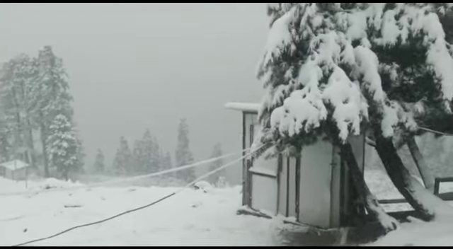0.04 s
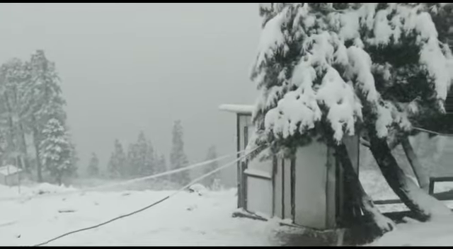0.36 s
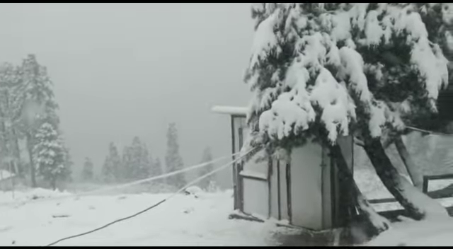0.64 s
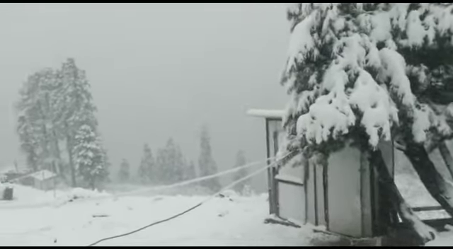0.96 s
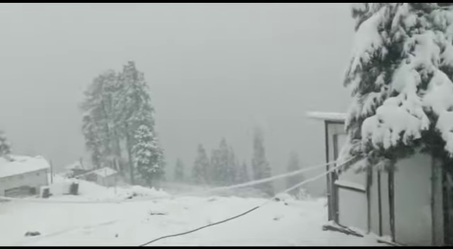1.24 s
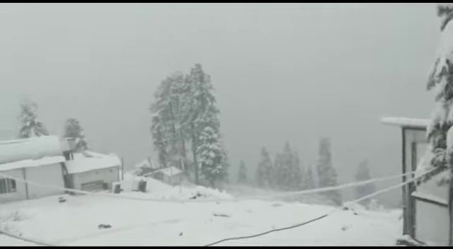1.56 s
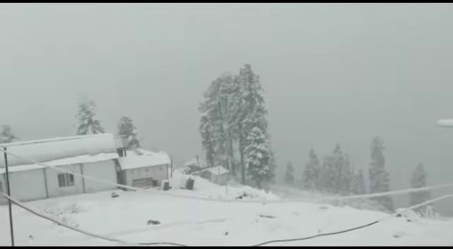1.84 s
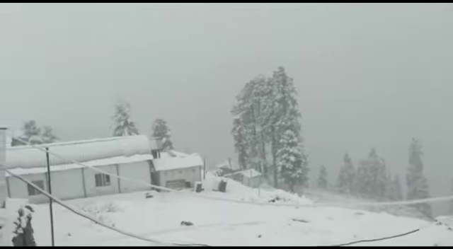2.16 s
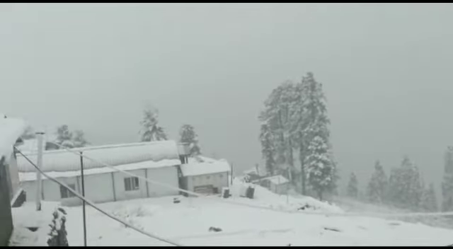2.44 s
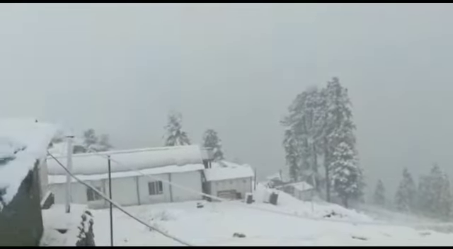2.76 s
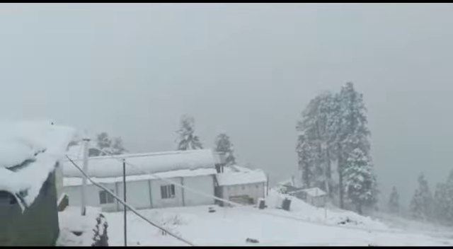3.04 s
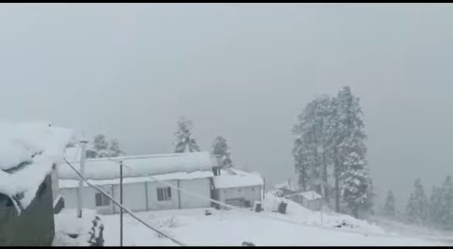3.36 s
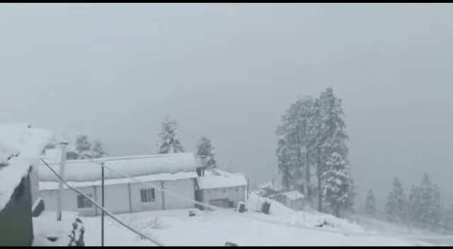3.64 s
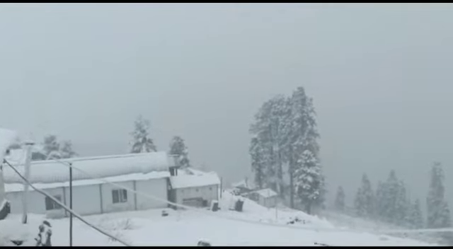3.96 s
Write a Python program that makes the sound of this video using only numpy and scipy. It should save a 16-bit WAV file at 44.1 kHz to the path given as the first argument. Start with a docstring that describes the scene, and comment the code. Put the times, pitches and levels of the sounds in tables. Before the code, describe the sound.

Soft, low wind buffeting outdoors, with faint ticking snow grains and rustling cloth.

```python
"""Light wind buffets the microphone ports of a hand-held camera turning slowly in a snowy yard.
Eddies rumble and thump, mostly on the right port, over a soft hush of air.
Snow grains tick on and near the camera. A jacket rustles with the turn, catches and scuffs once,
and packed snow crunches faintly as it gives way underfoot."""
import sys
import numpy as np
from scipy.fft import rfft, irfft, next_fast_len
from scipy.io import wavfile
from scipy.ndimage import uniform_filter1d, map_coordinates

SR = 44100
rng = np.random.default_rng(int(sys.argv[2]) if len(sys.argv) > 2 else 0)


def wrap_up_sound(samples):
    """Save the sound to the file named by the first command line argument, as 16-bit audio."""
    columns = np.atleast_2d(samples).T
    # keep every value between -1 and 1, then stretch to whole-number steps
    tamed = np.clip(columns, -1, 1)
    steps = np.round(tamed * 32767).astype(np.int16)
    wavfile.write(sys.argv[1], SR, steps)


N = 176400

# EQ for the body of a snow grain's tick and for its bright top: f/Hz, gain/dB
GRAIN_BODY_EQ = [(400, -43), (1400, -6.5), (2400, 0), (3700, 3), (4900, -3), (5700, 5), (7500, -73),
                 (15000, -56)]
GRAIN_TOP_EQ = [(2000, -51), (6000, 3), (8500, 1), (10000, -0.5), (12500, 4.5), (15500, 0.5)]


def amp(db):
    return 10 ** (np.asarray(db) / 20)


def unit(x):
    """Scaled to rms 1."""
    return x / np.sqrt(np.mean(x ** 2) + 1e-20)


def curves(rows):
    """One value per sample for each column after the time."""
    times, *columns = np.transpose(rows)
    return [np.interp(np.arange(N) / SR, times, column) for column in columns]


def wobble(rate):
    """A smooth random curve, rate knots a second."""
    knots = rng.standard_normal(int(N * rate / SR) + 4)
    return map_coordinates(knots, [np.arange(N) * rate / SR])


def colour(x, eq):
    """x shaped by (Hz, dB) points on a log axis."""
    n = x.shape[-1]
    m = next_fast_len(n + 4096)
    hz, db = np.transpose(eq)
    gain = amp(np.interp(np.log(np.fft.rfftfreq(m, 1 / SR) + 1), np.log(hz), db))
    return irfft(rfft(x, m) * gain, m)[..., :n]


def ring(x, hz, width_hz):
    """x through two like resonances in series, each width_hz wide with gain 1 at its centre."""
    n = x.shape[-1]
    m = next_fast_len(n + 4096)
    f = np.fft.rfftfreq(m, 1 / SR)
    resonance = 1j * f * width_hz / (hz * hz - f * f + 1j * f * width_hz)
    return irfft(rfft(x, m) * resonance ** 2, m)[..., :n]


def stereo_noise(alike, size=N):
    """Left and right white noise that share the fraction alike of their power."""
    noise = rng.standard_normal((3, size))
    return np.sqrt(alike) * noise[0] + np.sqrt(1 - alike) * noise[1:]


def pan(db):
    """Left and right gains of mean power 1; db is left minus right."""
    gains = np.array([amp(db / 2), amp(-db / 2)]).reshape(2, -1)
    return gains / np.sqrt(np.mean(gains ** 2, axis=0))


def add(out, start_s, x):
    """Mix x in at start_s."""
    i = max(0, round(start_s * SR))
    part = out[:, i:i + x.shape[1]]
    part += x[:, :part.shape[1]]


def wind():
    """Turbulence rumbles on each port separately; gusts bring up a finer flutter."""
    # gusts at the ports: t/s, level/dB, pan/dB
    gusts = [(0.0, -48, -23), (0.02, -45.5, -7), (0.07, -37.5, -28), (0.2, -36, -22), (0.27, -49.5, -6),
             (0.33, -43.5, -28), (0.44, -54, -5), (0.49, -50, -21), (0.62, -54, -1), (0.72, -49, -12),
             (0.85, -47.5, -9), (1.0, -48.5, -5), (1.06, -37, -17), (1.19, -57, -1), (1.22, -45, -11.5),
             (1.27, -34.5, 0), (1.3, -52.5, -9), (1.37, -33, -28), (1.41, -42.5, -18), (1.51, -39.5, -7.5),
             (1.57, -35.5, -20), (1.68, -52, 4), (1.76, -40, -26), (1.83, -45.5, -10.5), (1.97, -50, -4.5),
             (2.24, -54, -4.5), (2.45, -53, -8.5), (2.56, -43.5, -14), (2.71, -40, -23),
             (2.85, -44.5, -4.0), (3.02, -49.5, -11), (3.06, -61.5, 5), (3.16, -40, -30), (3.2, -44, -3),
             (3.51, -43, -21.5), (3.6, -45.5, -13), (3.68, -37, -30), (3.77, -46, -8), (3.8, -36.5, -24),
             (3.87, -42.5, -19.5), (4.0, -55, 8.5)]
    # EQ for the deep rumble and for the flutter above it: f/Hz, gain/dB
    rumble_eq = [(12, -8), (28, -3.5), (42, 1.5), (54, 5.5), (68, 0.5), (85, -1.5), (120, -9), (170, -21),
                 (250, -33.5), (400, -48.5), (800, -54), (2000, -76)]
    flutter_eq = [(100, -13), (180, 5), (250, -7.5), (400, -23), (700, -26.5), (1500, -45)]
    full_gust_db, flutter_growth = -37.5, 1.68  # growth in dB per dB of wind
    level_db, pan_db = curves(gusts)
    flow = unit(colour(stereo_noise(alike=0), rumble_eq))
    # dividing by its own envelope steadies the flow, so the gusts set the dynamics
    envelope = np.sqrt(np.abs(uniform_filter1d(flow ** 2, size=3500, axis=1)) + 1e-6)
    rumble = flow / envelope * amp(level_db + 4.5 + 1.76 * wobble(22.2))
    flutter = unit(colour(stereo_noise(alike=0) * amp(6 * wobble(45)), flutter_eq))
    flutter_db = -54.5 + flutter_growth * (level_db - full_gust_db)
    return (rumble + flutter * amp(flutter_db)) * pan(pan_db)


def eddies():
    """A single eddy thumps a port with one quick push and pull of pressure."""
    # eddy thumps: t/s, half width/s, level/dB, pan/dB
    thumps = [(0.085, 0.0028, -28.5, -32), (0.166, 0.0014, -34, -31), (0.197, 0.0019, -28.5, -33),
              (1.058, 0.0028, -28, -22), (1.227, 0.0021, -25, -36), (3.164, 0.0037, -25.5, -24),
              (3.676, 0.0018, -37.5, -4), (3.795, 0.0026, -30, -21)]
    out = np.zeros((2, N))
    t = np.arange(N) / SR
    for centre_s, half_width_s, level_db, pan_db in thumps:
        offset = (t - centre_s) / half_width_s
        pulse = -2 * offset / (1 + offset ** 2) ** 2
        out += pulse * amp(level_db) * pan(pan_db)
    return out


def yard_air():
    """The soft hush of the yard, its level swaying slightly."""
    # EQ for the air bed: f/Hz, gain/dB
    hush_eq = [(40, 14), (150, -2.5), (350, 4.5), (600, -2.5), (1100, -10), (1900, -8.5), (3800, -14),
               (5600, -19.5), (7500, -23), (10000, -22), (15500, -21)]
    level_db = -64 + 0.9 * wobble(3.47)
    return amp(level_db) * unit(colour(stereo_noise(alike=0.33), hush_eq))


def jacket_rustle():
    """Cloth slides in fine-grained swells and sounds a little different at each port."""
    # rustle swells: t/s, level/dB
    swells = [(0, -63.5), (.15, -60), (.3, -66), (.5, -60), (.63, -63.5), (.72, -63.5), (.88, -61),
              (1.02, -64), (1.15, -66), (1.45, -67.5), (1.7, -61), (1.86, -60.5), (2.05, -67),
              (2.35, -71.5), (2.7, -68), (3.1, -74), (3.23, -69), (3.4, -69), (3.55, -66), (3.77, -65),
              (3.9, -72.5), (4, -66.5)]
    # where the jacket sits: t/s, pan/dB
    position = [(0, 10), (.3, -0.5), (.85, -2.5), (4, -3)]
    # cloth EQ at each port: f/Hz, gain/dB
    left_eq = [(200, -2), (600, -11), (1200, -1), (2000, -6), (3700, 1), (4900, -1), (5600, 0.5),
               (7200, -14), (10000, -13), (15000, -11)]
    right_eq = [(200, -29), (600, -5), (1100, -4.5), (1900, 5), (3000, -4), (4000, -4.5), (5600, -7),
                (7200, -12), (10000, -18.5), (13000, -11.5), (15500, -16.5)]
    level_db, = curves(swells)
    pan_db, = curves(position)
    left, right = stereo_noise(alike=0.061) * amp(1.95 * wobble(500) + 2.7 * wobble(25.06))
    cloth = np.array([unit(colour(left, left_eq)), unit(colour(right, right_eq))])
    return cloth * amp(level_db) * pan(pan_db)


def fine_snow(grains_per_s=95, t60_s=0.0067):
    """Many tiny grains land at random to either side, some dull, some bright."""
    body, top = np.zeros((2, 2, N))
    t = np.arange(512) / SR
    for when, size_draw, side, brightness in rng.random((int(grains_per_s * N / SR), 4)):
        level_db = -71 + 2 * min(-np.log(size_draw), 3.2)  # a few stand out
        burst = rng.standard_normal((2, len(t)))
        grain = burst * amp(level_db - 60 * t / t60_s) * pan(20 * (side - 0.5))
        add(body, when * N / SR, grain * (1 - brightness))
        add(top, when * N / SR, grain * brightness)
    return amp(15.5) * colour(body, GRAIN_BODY_EQ) + amp(6.5) * colour(top, GRAIN_TOP_EQ)


def snow_ticks(attack_s=0.0003, tick_t60_s=0.0028, spray_t60_s=0.05):
    """Each larger grain lands with a sharp tick at its own pitch and a faint spray of fragments."""
    # grain hits: t/s, level/dB, f/Hz, treble send/dB, pan/dB
    hits = [(.049, -45, 5000, -3, -9), (0.215, -47.5, 4350, -6.5, 6), (0.425, -35, 3730, -37, 8),
            (.493, -40.5, 3840, -14, 27), (.573, -37, 3900, -14, 16), (.625, -40.5, 3440, -10, -7),
            (0.712, -40.5, 5300, -7.5, -2), (.873, -58.5, 5000, 2, 14), (0.92, -41.5, 3350, -15, 19),
            (1.074, -49.5, 5130, -1, 0), (1.144, -57.5, 5000, 7, 3), (1.375, -42.5, 3670, -9, 13),
            (1.404, -41.5, 4440, -7, 15), (1.473, -48, 4200, -8.5, 14), (1.827, -40.5, 2230, -19, 0),
            (1.836, -52, 3670, -1, -17), (1.870, -45.5, 3630, -13, 12), (1.945, -50, 5100, -1, -3),
            (2.021, -58, 3970, 5, -3), (2.051, -43, 3400, -14, 14), (2.226, -40, 3060, -14, -1),
            (2.56, -45, 3180, -27, 16), (2.600, -47, 3860, -7.5, -1), (2.65, -46.5, 3330, -3, 3),
            (2.837, -43.5, 3430, -10, 16), (3.265, -50, 4270, -12, 2), (3.423, -56, 5470, 1.5, -3),
            (3.536, -39.5, 4570, -6.5, -1.5), (3.624, -45, 2700, -11.5, 0), (3.706, -45, 2600, 1, -2),
            (3.813, -43.5, 4000, -11, 13), (3.964, -53, 5000, 2, -2), (3.975, -48, 4300, 0.5, -7)]
    body, top, pitched = np.zeros((3, 2, N))
    t = np.arange(2048) / SR
    decay = amp(-60 * t / tick_t60_s) + amp(-21 - 60 * t / spray_t60_s)
    envelope = (1 - np.exp(-t / attack_s)) * decay
    for start_s, level_db, hz, treble_db, pan_db in hits:
        gain = amp(level_db + 3.5) * pan(pan_db) * envelope
        add(body, start_s, gain * stereo_noise(alike=0.052, size=len(t)))
        add(pitched, start_s, ring(gain * stereo_noise(alike=0.17, size=len(t)), hz, width_hz=620))
        add(top, start_s, gain * amp(treble_db) * stereo_noise(alike=0, size=len(t)))
    clicks = amp(4.5) * colour(body, GRAIN_BODY_EQ) + amp(6) * colour(top, GRAIN_TOP_EQ)
    return clicks + amp(13) * pitched


def jacket_scuff(press_s=0.428, release_s=0.69):
    """A rub with a flickering squeak; under pressure the cloth sticks and slips in dull grains."""
    # the scuffing stroke: t/s, level/dB, pan/dB
    stroke = [(.1, -100, -5), (.23, -61.5, 5), (.42, -59, 2.5), (.47, -53.5, 9), (.57, -59.5, 0),
              (.645, -54.5, 1), (.73, -100, -5)]
    # EQ for the light rub and for the dull drag: f/Hz, gain/dB
    rub_eq = [(300, -8), (700, -9), (1150, -2), (1800, -12), (2600, -9), (3800, -8.5), (6000, -21.5),
              (15000, -32)]
    drag_eq = [(80, -3), (200, 2.5), (350, 0), (520, 1), (850, -24), (1400, -20), (3000, -43), (8000, -58)]
    level_db, pan_db = curves(stroke)
    t = np.arange(N) / SR
    rub = unit(colour(stereo_noise(alike=0.17) * amp(2.6 * wobble(350)), rub_eq))
    grip = stereo_noise(alike=0.79) * amp(4 * wobble(40.7))
    squeak = amp(-8) * unit(ring(grip, hz=1150, width_hz=190))
    pressure = uniform_filter1d(1.0 * ((t > press_s) & (t < release_s)), size=900)
    stick_slip = stereo_noise(alike=0.34) * amp(4.7 * wobble(110.56))
    drag = amp(-58.5) * unit(colour(stick_slip, drag_eq))
    return ((rub + squeak) * amp(level_db) + drag * pressure) * pan(pan_db)


def cloth_catches():
    """The sliding cloth grips for a moment and sounds one resonance."""
    # grips, each centred on its time: t/s, length/s, level/dB, f/Hz, width/Hz, pan/dB
    grips = [(.461, 0.0079, -68, 420, 500, 12), (0.51, 0.044, -58, 665, 298, 24),
             (0.565, 0.0047, -46, 870, 453, 8), (0.665, 0.022, -58, 1133, 70, 6),
             (0.67, 0.028, -51, 200, 120, 1), (0.877, 0.22, -70, 620, 804, 3),
             (1.683, 0.39, -77, 2190, 298, -1), (1.701, 0.49, -71.5, 495, 447, 0)]
    out = np.zeros((2, N))
    t = np.arange(SR) / SR
    middle_s = t.mean()
    for centre_s, length_s, level_db, hz, width_hz, pan_db in grips:
        tone = unit(ring(stereo_noise(alike=1, size=len(t)), hz, width_hz))
        swell = np.exp(-2 * ((t - middle_s) / length_s) ** 2)
        add(out, centre_s - middle_s, tone * swell * amp(level_db) * pan(pan_db))
    return out


def snow_crunches(attack_s=0.00026):
    """Packed snow gives way underfoot in short gritty bursts with a hollow ring."""
    # collapses of the snow: t/s, level/dB, t60/s, f/Hz, pan/dB
    collapses = [(1.324, -51, 0.088, 1510, -4), (1.334, -55.5, 0.1, 2070, -6),
                 (1.347, -54, 0.065, 1580, -2), (1.374, -56, 0.023, 1680, -11),
                 (2.140, -49, 0.035, 1590, -1), (2.158, -46.5, 0.044, 1640, -7),
                 (2.202, -60.5, 0.16, 1390, -5), (3.471, -53.5, 0.078, 3650, -8),
                 (3.476, -48, 0.034, 1610, -2), (3.553, -53.5, 0.058, 1450, -4),
                 (3.706, -51, 0.028, 2610, -15)]
    # EQ for the grit: f/Hz, gain/dB
    grit_eq = [(700, -21), (1500, -5.5), (2100, -14), (2800, -4), (3700, -8), (5500, -12.5), (8000, -20),
               (15000, -21.5)]
    grit, hollow = np.zeros((2, 2, N))
    t = np.arange(6000) / SR
    for start_s, level_db, t60_s, hz, pan_db in collapses:
        envelope = (1 - np.exp(-t / attack_s)) * amp(level_db + 11 - 60 * t / t60_s)
        burst = envelope * pan(pan_db) * stereo_noise(alike=0.18, size=len(t))
        add(grit, start_s, burst)
        add(hollow, start_s, ring(burst, hz, width_hz=0.38 * hz))
    return colour(grit * amp(0.74 * wobble(950)), grit_eq) + amp(2) * hollow


def scene():
    """Wind on the ports over the small sounds of cloth and snow."""
    air = wind() + eddies() + yard_air()
    jacket = jacket_rustle() + jacket_scuff() + cloth_catches()
    snow = snow_ticks() + fine_snow() + snow_crunches()
    return air + jacket + snow


def record(dry):
    """The camera passes nothing above its band limit."""
    top_hz = 15800
    m = next_fast_len(N + 8192)
    passband = np.fft.rfftfreq(m, 1 / SR) < top_hz
    return irfft(rfft(dry, m) * passband, m)[:, :N]


dry = scene()
out = record(dry)
wrap_up_sound(out)
```